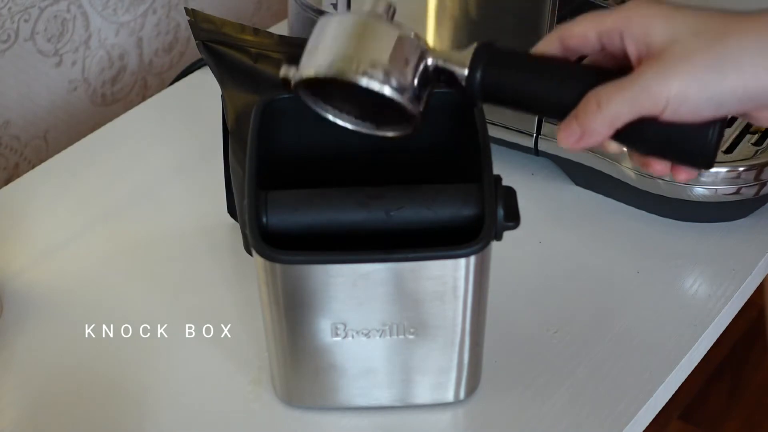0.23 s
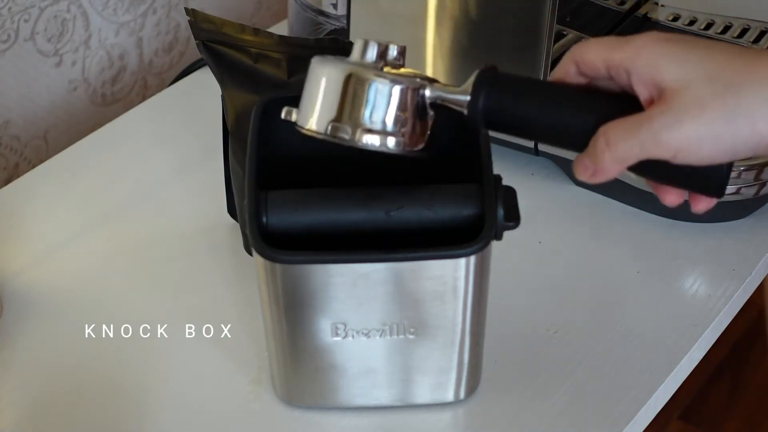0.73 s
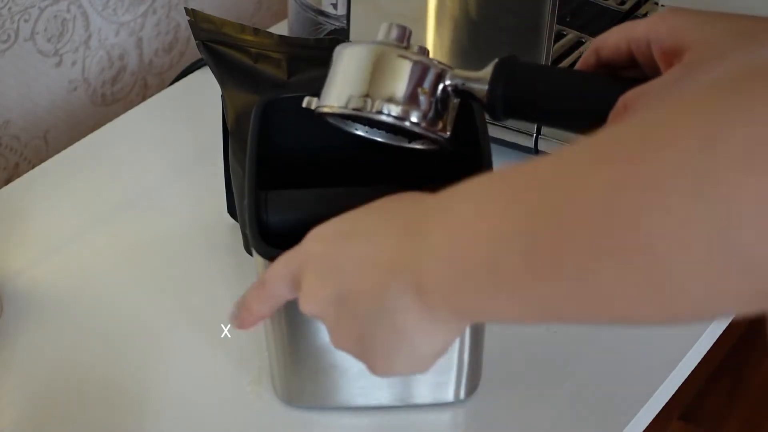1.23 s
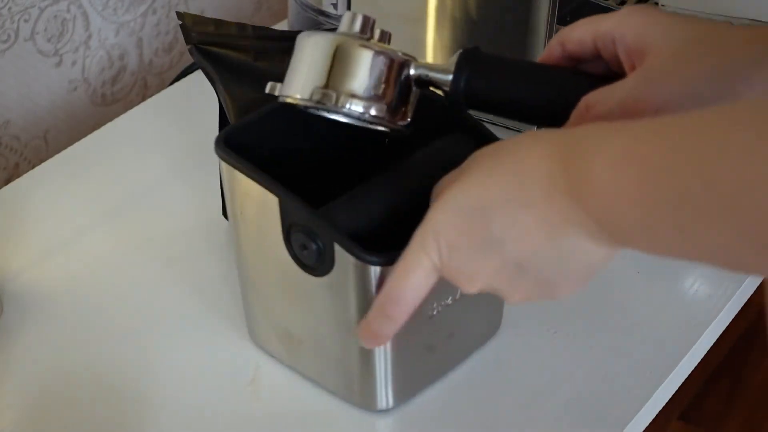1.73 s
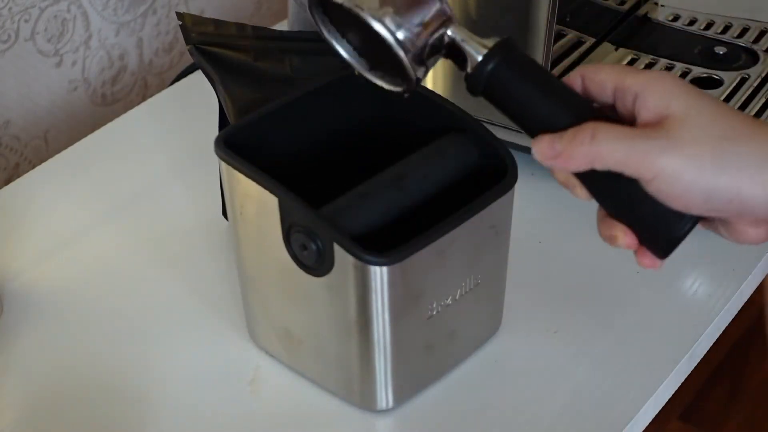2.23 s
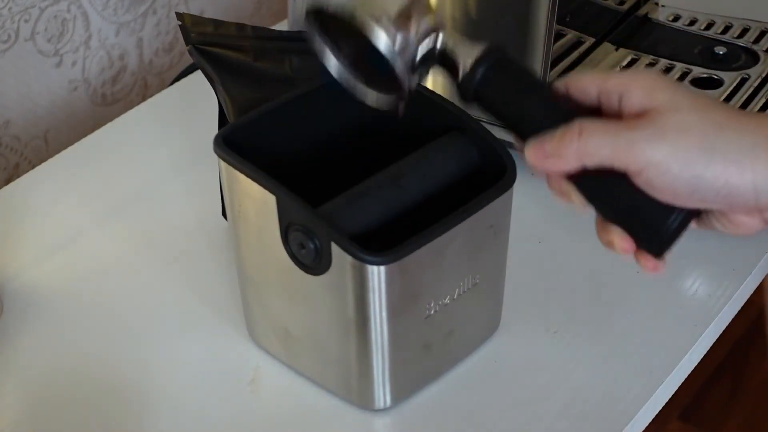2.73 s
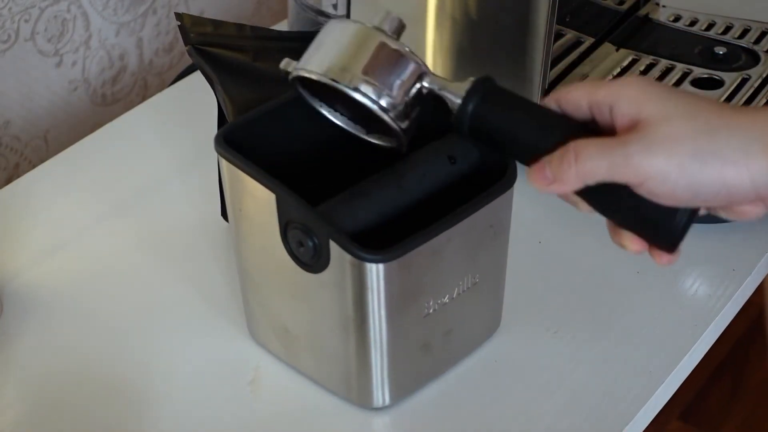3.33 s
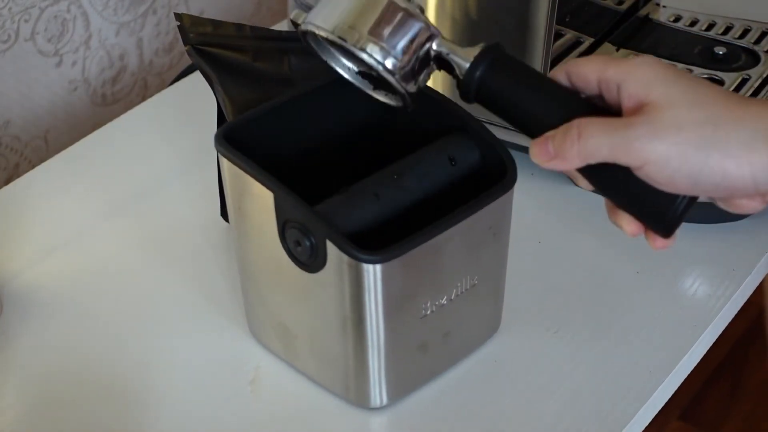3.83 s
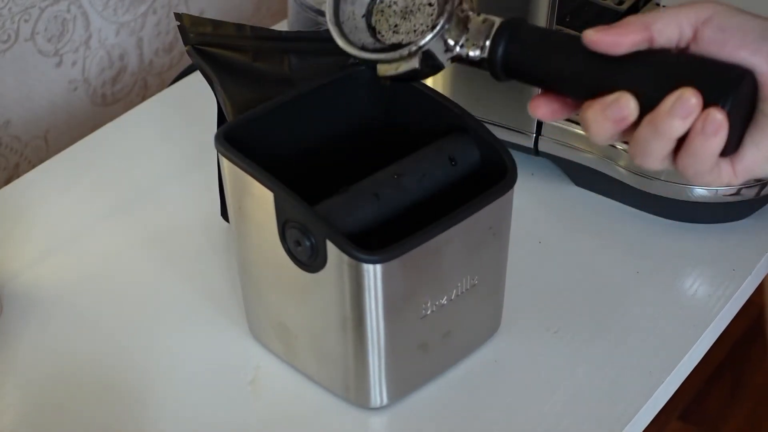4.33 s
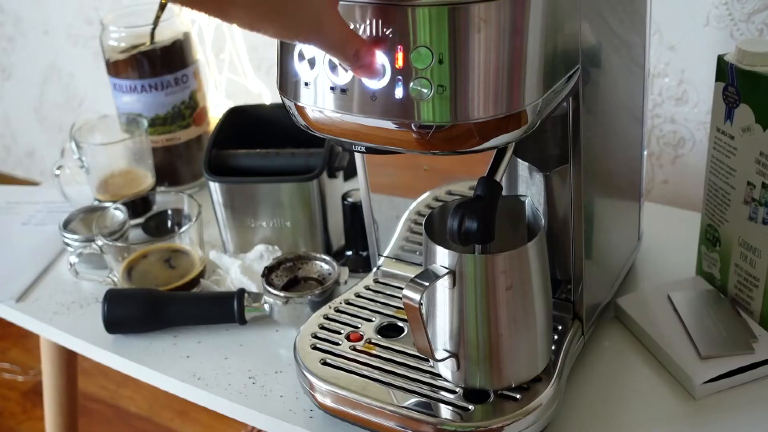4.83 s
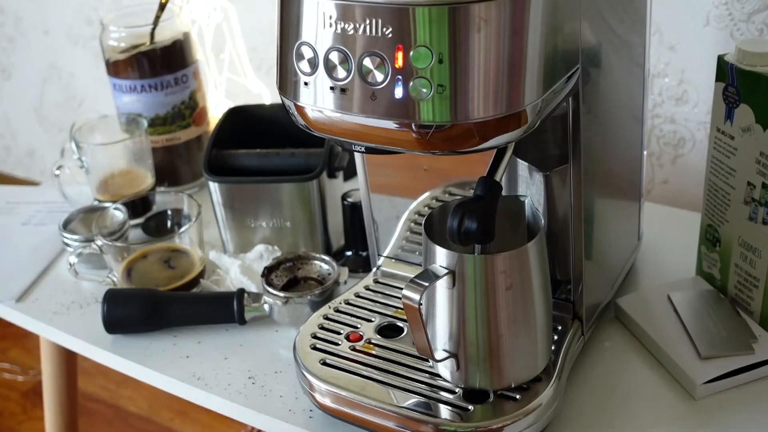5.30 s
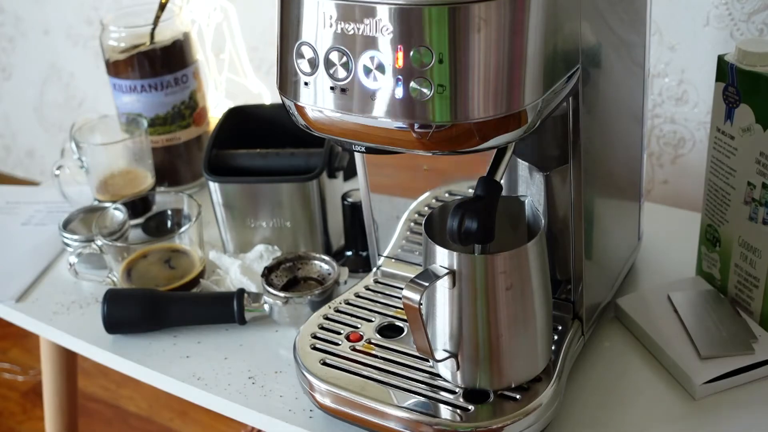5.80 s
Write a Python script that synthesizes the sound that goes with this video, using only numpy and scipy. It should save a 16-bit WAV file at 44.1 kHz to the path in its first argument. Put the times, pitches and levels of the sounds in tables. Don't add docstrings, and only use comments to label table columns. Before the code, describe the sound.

In a live kitchen, loud rubbery knocks with clacking bin and ringing metal basket, then small button clicks and a swelling steam hiss.

```python
import sys
import numpy as np
from scipy import signal
from scipy.fft import rfft, irfft
from scipy.io import wavfile
from scipy.ndimage import uniform_filter1d, minimum_filter1d

SR = 44100
rng = np.random.default_rng(int(sys.argv[2]) if len(sys.argv) > 2 else 0)


def attenuation_scalar(level_db):
    decades = np.asarray(level_db, float) / 20
    return 10 ** decades


def to_wav(sig):
    pcm = np.clip(np.atleast_2d(sig), -1, 1) * 32767
    pcm = np.round(pcm).astype(np.int16)
    wavfile.write(sys.argv[1], SR, pcm.T)


N = 267290
PLASTIC_T60_S = 0.014


def evened(x):
    return x / np.sqrt(np.mean(x ** 2) + 1e-20)


def read(points, hz):
    f, value = np.transpose(points)
    return np.interp(np.log(hz + 1), np.log(f + 1), value)


def coloured(x, spectrum):
    hz = np.fft.rfftfreq(x.shape[-1], 1 / SR)
    return irfft(rfft(x) * attenuation_scalar(read(spectrum, hz)), x.shape[-1])


def add(mix, start_s, sound):
    part = mix[round(start_s * SR):][:len(sound)]
    part += sound[:len(part)]


def high_pass(x, edge_hz):
    return signal.sosfilt(signal.butter(3, edge_hz, "high", fs=SR, output="sos"), x)


def ring(hz, db, t60_s, rise_s=0.00025):
    t = np.arange(round(1.2 * abs(t60_s) * SR) + 50) / SR
    return attenuation_scalar(db - 60 * t / abs(t60_s)) * np.sin(2 * np.pi * hz * t) * (1 - np.exp(-t / rise_s))


def burst(db, t60_s, edge_hz, count=600):
    at = np.arange(count)
    b, a = signal.butter(2, min(edge_hz, 18000), fs=SR)
    puff = evened(signal.lfilter(b, a, rng.standard_normal(count)))
    return attenuation_scalar(db - 60 * at / SR / t60_s) * puff * (1 - np.exp(-at / 2.2))


def air(spectrum, same, patchy_db):
    frames, hz = N // 256 + 5, np.fft.rfftfreq(1024, 1 / SR)
    a, b, c, d, patches = rng.standard_normal((frames, 513, 5)).T
    patches = uniform_filter1d(patches, size=10, axis=0)
    patches = evened(uniform_filter1d(patches, size=12, axis=1))
    same = np.clip(same, -1, 1)
    left, other = a + 1j * b, c + 1j * d
    z = np.array([left, same * left + np.sqrt(1 - same ** 2) * other])
    z = z * attenuation_scalar(read(spectrum, hz)[:, None] + patchy_db * patches)
    return evened(signal.istft(z, nperseg=1024, noverlap=768)[1][:, :N])


# (freq_hz, level_db_per_hz)
FIRST_HUM = [(30, -73), (161, -18.5), (199, -9), (303, -10), (569, -2), (844, -3.5), (1070, -1),
             (2700, -10.5), (3400, -18), (5170, -20), (7270, -24.5), (14400, -28.5), (16000, -28.5)]
# (freq_hz, level_db_per_hz)
SECOND_HUM = [(18, -54), (30, -28), (81, -47), (221, -13), (512, -9), (721, -2.5), (889, -7.5), (962, -6.5),
              (1960, -10.5), (2750, -16.5), (13700, -29), (16000, -25.5)]
# (freq_hz, likeness_0_to_1)
LIKENESS = [(60, 0.34), (180, 0.85), (550, 0.74), (1650, 0.72), (4970, 0.7), (15000, 0.81)]


def background():
    move_s, fade_s = 4.7, 0.087
    stir_db, settle_s = 3.8, 0.31
    duck_s, duck_db_per_s = 5.74, -8
    t = np.arange(N) / SR
    same = read(LIKENESS, np.fft.rfftfreq(1024, 1 / SR))[:, None]
    come = np.clip(0.5 + (t - move_s) / fade_s, 0, 1)
    second_db = -48.5 + stir_db * np.exp(-abs(t - move_s) / settle_s)
    second_db += duck_db_per_s * np.maximum(t - duck_s, 0)
    first = attenuation_scalar(-43.5) * air(FIRST_HUM, same, patchy_db=1.5) * attenuation_scalar([[0.9], [-0.9]])
    second = attenuation_scalar(second_db) * air(SECOND_HUM, same, patchy_db=1.1) * attenuation_scalar([[0.4], [-0.4]])
    return (1 - come) * first + come * second


# (freq_hz, t60_s)
ROOM_DECAY = [(120, 0.46), (400, 0.66), (1040, 0.65), (2760, 0.64), (7280, 0.57), (14000, .35)]


def kitchen(x, gap_s=0.006, alike=0.91):
    taps = np.zeros((2, SR))
    slots = np.arange(round(gap_s * SR), SR - 16, 16)
    at = slots + rng.integers(0, 16, (2, len(slots)))
    np.put_along_axis(taps, at, rng.choice([-1., 1.], at.shape), 1)
    taps[1] = alike * taps[0] + np.sqrt(1 - min(alike, 1) ** 2) * taps[1]
    hz, t, z = signal.stft(taps, SR, nperseg=256)
    z[1] = np.where(hz[:, None] < 300, 0.5 * (z[0] + z[1]), z[1])
    far_walls = 0.47 * np.exp(-((t - 0.08) / 0.025) ** 2)
    build = 1 - np.exp(-t / 0.0018) + far_walls
    decay = attenuation_scalar(-60 * t / read(ROOM_DECAY, hz)[:, None])
    tail = signal.istft(z * decay * build, SR, nperseg=256)[1]
    return signal.fftconvolve(x[None], tail / np.linalg.norm(tail[0]), axes=1)[:, :N]


# (time_s, hiss_db, roar_above_hiss_db)
STEAM_GROWTH = [
    (5.6, -67, 6),
    (5.61, -53.5, -2),
    (5.634, -43.5, -10),
    (5.668, -40, -5.5),
    (6.014, -30, -11),
    (6.06, -32, -13),
]
# (freq_hz, level_db_per_hz)
JET_SPECTRUM = [(880, -35), (1500, -4), (1870, -2), (2030, -3), (3180, -4), (3450, -7), (6050, -5.5),
                (14500, -9.5), (16000, -13), (16500, -45)]
# (freq_hz, level_db_per_hz)
ROAR_SPECTRUM = [(120, -55), (200, -13.5), (352, -19.5), (414, -10.5), (650, -5.5), (784, -5.5),
                 (1160, -5.5), (2190, -21), (4000, -12), (5200, -34), (8800, -120)]


def steam():
    time_s, hiss_db, roar_db = np.transpose(STEAM_GROWTH)
    t = np.arange(N) / SR
    sputter = attenuation_scalar(0.72 * evened(uniform_filter1d(rng.standard_normal(N), size=90)))
    hiss = air(JET_SPECTRUM, 0.89, patchy_db=0.9) * sputter
    roar = attenuation_scalar(np.interp(t, time_s, roar_db)) * air(ROAR_SPECTRUM, 0.88, patchy_db=0.8)
    return attenuation_scalar(np.interp(t, time_s, hiss_db, left=-120)) * (hiss + roar)


# (start_s, level_db, t60_s, edge_hz)
HAND_BRUSHES = [(1.129, -46, 0.013, 15900), (1.576, -53, 0.018, 12000), (1.582, -31, 0.026, 3000),
                (4.741, -43, 0.011, 15000), (4.889, -40, .008, 15000), (4.969, -39, .01, 14000),
                (5.445, -46, 0.043, 6000)]


def brushes():
    out = np.zeros(N)
    for start_s, level_db, t60_s, edge_hz in HAND_BRUSHES:
        add(out, start_s, np.diff(burst(level_db, t60_s, edge_hz, count=1500)))
    return out


# (start_s, level_db, pitch_hz, t60_s)
FAINT_RINGS = [
    (1.617, -49, 2900, .01),
    (5.525, -56, 9700, .15),
    (5.52, -51, 13205, .12),
    (5.545, -54, 13205, 0.074),
]


def faint_rings():
    out = np.zeros(N)
    for start_s, level_db, pitch_hz, t60_s in FAINT_RINGS:
        add(out, start_s, ring(pitch_hz, level_db, t60_s))
    return out


SPRING_SLIPS = [4.875, 4.882, 4.891, 4.893, 4.8962, 4.8995, 4.9024, 4.9048, 4.907, 4.911, 4.915]


def button_slips():
    top_s, hold_s, rise_db_per_s, fall_db_per_s = 4.896, 0.0082, 600, 1400
    snap_steeper = 2.2
    out = np.zeros(N)
    for start_s in SPRING_SLIPS:
        before_db = rise_db_per_s * (top_s - start_s)
        after_db = fall_db_per_s * (start_s - top_s - hold_s)
        below_db = max(before_db, after_db, 0)
        db = -19.5 - below_db
        luck = rng.uniform(0.71, 1.33, 3)
        add(out, start_s, ring(887, db - 12, 0.063))
        add(out, start_s, ring(2100 * luck[0], db, 0.0078))
        add(out, start_s, ring(3500 * luck[1], db - 14, 0.01))
        add(out, start_s, ring(9300 * luck[2] ** 0.2, -18.5 - snap_steeper * below_db, 0.0051))
        add(out, start_s, burst(db - 7, 0.037, edge_hz=4100))
    return out


# (start_s, level_db, tick_db, modes (pitch_hz, level_db, t60_s))
HANDLE_TAP = (.2938, -7.5, -20, [(656, -0.5, 0.053), (668, -17.5, 0.43), (711, -19, 0.32), (561, -6, 0.042),
              (1500, 4, 0.013), (2050, 3, 0.013), (2300, -1, 0.013), (2630, -6, 0.013), (3000, -3, 0.014),
              (3700, -11, 0.0055), (4110, -5.5, 0.012)])
BUTTON_PRESS = (4.7418, -19.5, -28, [(910, -10, 0.049), (1500, -16, 0.013), (1800, -14, 0.014),
                (2180, 7, .016), (2560, -8, 0.014), (3000, 1.5, .013), (3770, -11, 0.007)])


def tap_and_press():
    out = np.zeros(N)
    for start_s, level_db, tick_db, modes in (HANDLE_TAP, BUTTON_PRESS):
        add(out, start_s, burst(tick_db, 0.049, edge_hz=4000))
        for k, (pitch_hz, mode_db, t60_s) in enumerate(modes):
            held_t60_s = t60_s if pitch_hz < 1000 else min(t60_s, PLASTIC_T60_S)
            swing = (-1) ** k
            add(out, start_s, swing * ring(pitch_hz, level_db + mode_db, held_t60_s))
    return out


CHIEF_RINGS_HZ = 11796, 13905, 8613
# (pitch_hz, level_db)
LESSER_RINGS = [(7050, -6), (7773, -10), (11360, -6), (12510, -9), (13135, -8), (13570, -8), (15090, -8)]
# (freq_hz, level_db_per_hz)
CHATTER_SPECTRUM = [(88, -36), (150, -23), (260, -3), (539, -7), (656, -0.5), (738, -10), (991, 2.5),
                    (1160, -1.5), (1970, -0.5), (2810, -6), (13600, -9), (15600, -11), (16500, -63)]
# (start_s, level_db, t60_s, ring_db)
RIM_CHATTER = [
    (2.518, 1.5, 0.094, -38),
    (2.528, -8, 0.36, -9.5),
    (2.539, -16.5, 0.49, 0.5),
]
# (start_s, level_db, t60_s, ring_db)
SOFT_CHATTER = [
    (3.559, -21, 0.056, -39),
    (3.573, -9.5, 0.08, -28),
    (3.5921, -1, 0.034, -12),
]


def basket():
    steel_t60_s = 0.09
    rim_mix_db, bar_mix_db, soft_mix_db = (2.5, -30, -8), (-6, -3, -6.5), (-2.5, -10, -16)
    rows = [(*row, rim_mix_db) for row in RIM_CHATTER]
    rows += [(*row, soft_mix_db) for row in SOFT_CHATTER]
    for start_s, _, land_lag_s, land_db, ring_db in BAR_KNOCKS:
        land_s = start_s + land_lag_s
        rows.append((land_s + 0.0012, land_db - 8, 0.061, -40, bar_mix_db))
        rows.append((land_s + 0.0058, -1.8, 0.25, ring_db, bar_mix_db))
    out, t = np.zeros(N), np.arange(SR // 2) / SR
    for start_s, level_db, t60_s, ring_db, mix_db in rows:
        lumps_db = 2 * rng.exponential(1, len(t) // 20 + 1).repeat(20)[:len(t)]
        taps = rng.standard_normal(len(t)) * attenuation_scalar(lumps_db)
        shake = attenuation_scalar(-60 * t / t60_s) * (1 - np.exp(-t / 0.0017))
        add(out, start_s, evened(coloured(taps, CHATTER_SPECTRUM)) * shake * attenuation_scalar(level_db))

        chief_db = ring_db + np.array(mix_db)
        steel = sum(ring(hz, db, steel_t60_s) for hz, db in zip(CHIEF_RINGS_HZ, chief_db))
        for pitch_hz, mode_db in LESSER_RINGS:
            luck_db = 2 * rng.standard_normal()
            add(steel, 0, ring(pitch_hz, chief_db[-1] + mode_db + luck_db, steel_t60_s))
        strikes = taps * attenuation_scalar(-60 * t / 0.02)
        add(out, start_s, signal.fftconvolve(strikes / np.linalg.norm(strikes), steel))
    return out


# (start_s, level_db, pitch_hz, t60_s, tick_below_db)
HARD_CONTACTS = [(1.637, -19, 1960, 0.02, -16), (1.6403, -9.5, 2430, 0.011, -17),
                 (1.642, -5, 2300, 0.0058, -29), (1.646, -21, 1500, 0.05, -14),
                 (1.650, -16, 1800, 0.014, -8.5), (2.5125, 12, 2062, 0.014, -12),
                 (2.513, 11, 1132, 0.015, -22), (3.5664, -3.5, 1970, 0.023, -9.5),
                 (3.579, -0.5, 1821, 0.034, -22), (3.584, 0, 2680, 0.0045, -18)]
# (pitch_hz, level_db, t60_s)
BIN_MODES = [(670, -4, 0.067), (590, -8, 0.038), (805, -2.5, 0.044), (1020, -8, 0.026)]


def clacks():
    contacts = list(HARD_CONTACTS)
    for start_s, thud_db, land_lag_s, land_db, _ in BAR_KNOCKS:
        contacts.append((start_s + 0.000997, thud_db - 0.5, 1570, 0.007, -7.5))
        contacts.append((start_s + land_lag_s, land_db, 1859, 0.026, -3.5))
    out = np.zeros(N)
    for start_s, level_db, pitch_hz, t60_s, tick_db in contacts:
        add(out, start_s, ring(pitch_hz, level_db, min(0.82 * t60_s, PLASTIC_T60_S)))
        for octave in np.linspace(-1.6, 1.5, num=26):
            detune, late = rng.random(2)
            mode_hz = pitch_hz * 2 ** (octave + 0.092 * detune)
            mode_db = level_db - 10.5 - 4.4 * octave ** 2
            mode_t60_s = 1.1 * t60_s * np.sqrt(pitch_hz / mode_hz)
            add(out, start_s + 0.003 * late ** 2, ring(mode_hz, mode_db, mode_t60_s))
        add(out, start_s, burst(level_db + tick_db, 0.016, edge_hz=7200))
        for bin_hz, bin_db, bin_t60_s in BIN_MODES:
            add(out, start_s, ring(bin_hz, level_db - 14 + bin_db, bin_t60_s))
    return out


# (start_s, thud_db, land_lag_s, land_db, basket_ring_db)
BAR_KNOCKS = [
    (2.7855, 2.5, 0.0078, 6.5, 0),
    (3.0556, 4, .0072, 6.5, -5),
    (3.3045, -4.5, .0075, 6.5, -7),
]
# (start_s, level_db, push_hz, drum_db)
OTHER_PUSHES = [
    (1.637, -8, 322, -19),
    (2.513, -26, 600, -6.5),
    (3.561, -8, 260, -10.5),
    (3.586, -4.5, 487, -10),
]
# (pitch_hz, level_db, t60_s)
COUNTER_MODES = [(136.6, -21, 0.37), (201.7, -26.5, 0.58), (260, -17, 0.45)]


def thuds():
    pushes = list(OTHER_PUSHES)
    pushes += [(start_s, thud_db, 260, -3.5) for start_s, thud_db, *_ in BAR_KNOCKS]
    push, drum = np.zeros((2, N))
    for start_s, level_db, push_hz, drum_db in pushes:
        add(push, start_s, -ring(push_hz, level_db, 0.023, rise_s=0.0022))
        for pitch_hz, mode_db, t60_s in COUNTER_MODES:
            add(drum, start_s, ring(pitch_hz, drum_db + mode_db, t60_s, rise_s=0.0087))
    return push, drum


def scene():
    small = high_pass(tap_and_press() + button_slips() + faint_rings() + brushes(), 480)
    steel = basket()
    push, drum = thuds()
    hits = push + high_pass(clacks(), 380)
    near = (hits + steel + small + drum) * attenuation_scalar([[0.2], [-0.2]])
    room = attenuation_scalar(-5.5) * kitchen(hits + 1.06 * drum)
    room += attenuation_scalar(-5.5) * kitchen(steel, alike=0.84)
    room += attenuation_scalar(-11.5) * kitchen(small, gap_s=0.011)
    return high_pass(near + room, 125) + steam() + background()


def low_pass(x):
    return signal.sosfilt(signal.butter(12, 16790, fs=SR, output="sos"), x)


def record(dry):
    release_s = 0.077
    x = signal.oaconvolve(dry, signal.firwin(255, 16000, fs=SR)[None], "same")
    peak = -minimum_filter1d(-abs(x).max(0), size=60)
    over_db = np.maximum(20 * np.log10(peak + 1e-9) + 3.0, 1e-6)
    climb = np.arange(N) / SR / release_s
    cut_db = np.exp(np.maximum.accumulate(np.log(over_db) + climb) - climb)
    limited = x / attenuation_scalar(uniform_filter1d(cut_db, size=40))
    return low_pass(limited)


dry = scene()
out = record(dry)
to_wav(out)
```